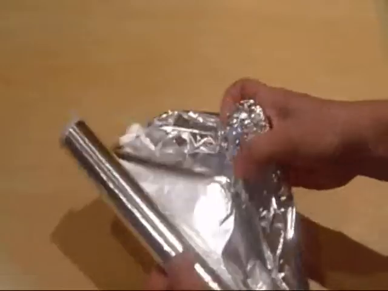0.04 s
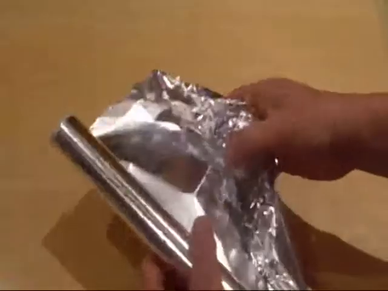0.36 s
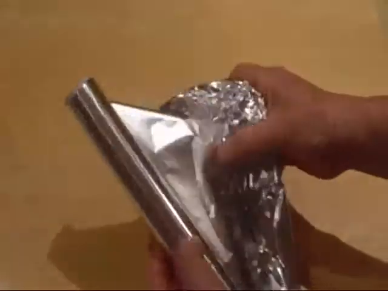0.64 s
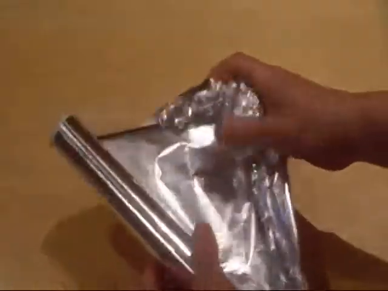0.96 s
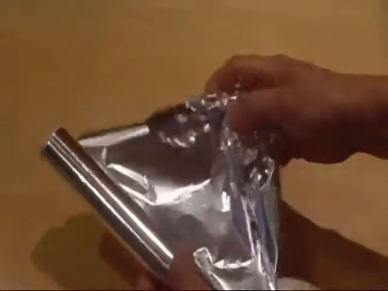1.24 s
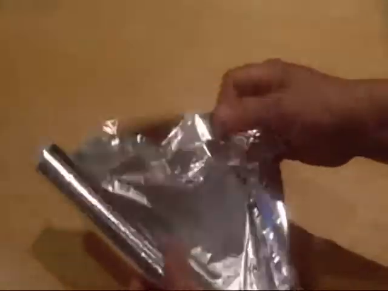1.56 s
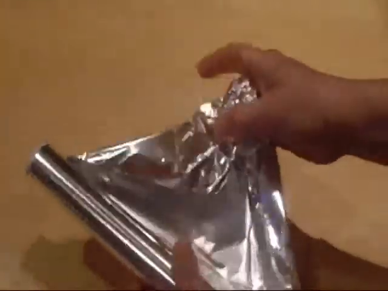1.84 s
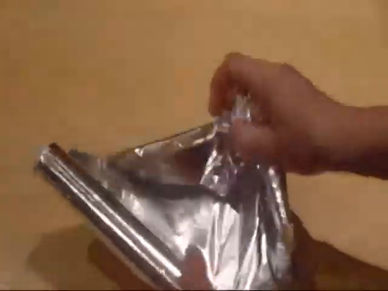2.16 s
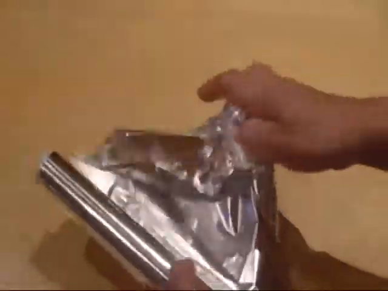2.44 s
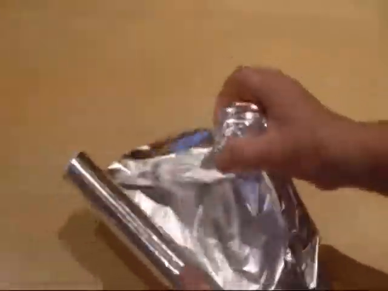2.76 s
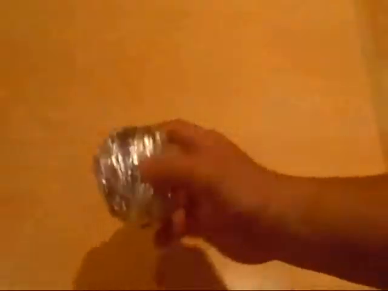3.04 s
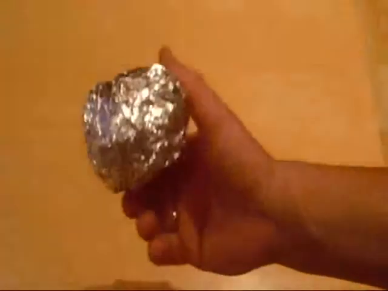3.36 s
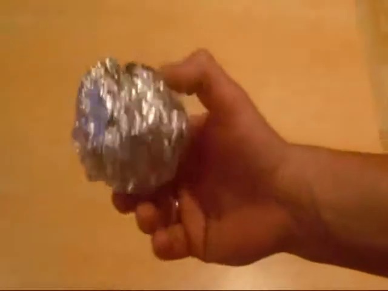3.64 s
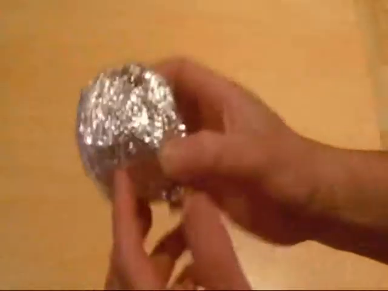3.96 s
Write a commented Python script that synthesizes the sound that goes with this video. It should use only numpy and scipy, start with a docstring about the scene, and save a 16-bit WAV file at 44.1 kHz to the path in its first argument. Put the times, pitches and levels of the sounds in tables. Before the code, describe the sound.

Close, bright crackling of aluminium foil being crushed swells and eases with sharp snaps, then cuts off. Faint ticks and rustles follow as fingers turn the foil ball in a small, quiet room.

```python
"""Crushing aluminium foil

A hand gathers foil off its roll and crushes it, close up in a small room. Thousands of tiny creases snap, in
surges as the fist tightens, and now and then a larger facet pops through. The crumpling breaks off abruptly as
the scene changes; then the finished ball ticks faintly as fingers turn it, over a low rumble."""
import sys
import numpy as np
from scipy import signal
from scipy.fft import rfft, irfft
from scipy.io import wavfile
from scipy.ndimage import uniform_filter1d

SR = 44100
rng = np.random.default_rng(int(sys.argv[2]) if len(sys.argv) > 2 else 0)


def output_pcm(signal):
    """Save a mono or channel-first signal as 16-bit PCM at the path in sys.argv[1].

    Samples are clipped to [-1, 1] before scaling.
    """
    pcm = np.clip(np.atleast_2d(signal).T, -1, 1) * 32767
    wavfile.write(sys.argv[1], SR, np.round(pcm).astype(np.int16))


N = 176400
T = np.arange(N) / SR
STOP_S, TOP_HZ = 2.964, 15720  # end of the crumpling; top edge of the sound
CREASES_PER_S, CREASE_DECAY_S = 4300, 0.00024


# The sizzle of the creases and the duller body of the sheet. Each row: frequency in Hz, relative dB.
CREASE_EQ = [(300,-31.5), (1500,-12.5), (4000,-5.5), (5700,-10), (7500,-4), (10000,1), (12500,1),
             (16000,-.5)]
SHEET_EQ = [(120,-26), (300,-10.5), (750,-9), (1150,-3), (2000,0), (2700,-1.5), (4100,-0.5), (5700,-5.5),
            (9000,-7), (16000,-51)]

def crumpling(flexes_per_s=1500, flex_decay_s=0.00052):
    """Tiny creases snap brightly while the sheet flexes under them, both riding the hand's push."""
    crease_level, sheet_level = hand_push()
    creases = snaps(CREASES_PER_S, spread_db=-2)
    flexes = even(0.56 * creases + snaps(flexes_per_s, spread_db=3.5))  # creases shake the sheet too
    clusters = amp(1.6 * wander(120))  # brief flurries, as when creases set each other off
    bright = amp(2) * colour(crackle(creases * clusters * crease_level, CREASE_DECAY_S), CREASE_EQ)
    body = amp(-1) * colour(crackle(flexes * sheet_level, flex_decay_s), SHEET_EQ)
    return bright + shifting_resonances(body + room(buckles(sheet_level)))


# The steady squeeze. Each row: time in seconds, crease drive in dB, sheet drive in dB.
SQUEEZE = [(0, -27.5, -32.5), (0.18, -29, -32), (0.2, -34.5, -36), (0.35, -30.5, -32), (0.47, -34, -37),
           (0.62, -28, -31.5), (0.74, -32.5, -34.5), (0.81, -26, -27), (0.93, -35, -36), (1.07, -37, -36),
           (1.25, -27.5, -30.5), (1.42, -32.5, -34.5), (1.49, -38, -41), (1.51, -41, -35),
           (1.73, -30, -36.5), (1.74, -34, -38.5), (2.1, -33.5, -35.5), (2.15, -28.5, -31.5),
           (2.42, -27.5, -35.5), (2.56, -28.5, -33.5), (2.61, -40, -40.5), (2.62, -29.5, -35),
           (2.79, -26.5, -31.5), (2.81, -29, -34.5), (2.96, -34, -34.5)]
# Folds giving way. Each row: centre and half width in seconds, crease drive and sheet drive in dB.
FOLD_SURGES = [(0.008, 0.0055, -30, -34), (0.089, 0.0047, -26, -30), (0.276, 0.0085, -29, -35),
               (0.376, 0.011, -26, -35), (0.42, 0.0074, -26.5, -33), (0.545, 0.012, -24.5, -31.5),
               (0.672, 0.007, -28.5, -36), (0.789, 0.0095, -26, -35), (0.823, 0.0035, -26, -31),
               (0.945, 0.0033, -29, -33), (1.003, 0.014, -25.5, -28.5), (1.089, 0.011, -23, -29),
               (1.134, 0.009, -21, -27.5), (1.228, 0.004, -26.5, -37), (1.35, 0.0035, -26, -40),
               (1.381, 0.004, -28, -35), (1.543, 0.023, -30, -35.5), (1.658, 0.015, -28.5, -34.5),
               (1.82, 0.0045, -29, -35), (1.859, 0.009, -20.5, -25), (1.988, 0.0032, -25, -36),
               (2.04, 0.02, -29, -30.5), (2.244, 0.0046, -23.5, -35), (2.284, 0.012, -27, -29.5),
               (2.346, 0.011, -28, -33.5), (2.421, 0.019, -26.5, -29), (2.724, 0.0081, -25, -30),
               (2.768, 0.014, -32, -34), (2.92, 0.015, -23.5, -32)]

def hand_push():
    """Envelopes for creases and sheet: the fist's pressure, with a surge whenever a fold gives way."""
    times, creases_db, sheets_db = np.array(SQUEEZE).T
    crease_power = amp(np.interp(T, times, creases_db)) ** 2
    sheet_power = amp(np.interp(T, times, sheets_db)) ** 2
    for centre, width, crease_db, sheet_db in FOLD_SURGES:
        surge = swell(centre, width)
        crease_power += surge * amp(crease_db) ** 2
        sheet_power += surge * amp(sheet_db) ** 2
    return np.sqrt(crease_power), np.sqrt(sheet_power)


def buckles(push, per_s=170, centre_hz=2620, spread_oct=0.68, spread_db=2.5, decay_cycles=2.05):
    """Small facets flip at random, each ringing a few cycles at its own pitch."""
    t = T[:1000]
    out = np.zeros(N + len(t))
    draws = rng.standard_normal((1500, 3))
    starts = np.cumsum(np.abs(draws[:, 0])) * np.sqrt(np.pi / 2) / per_s
    for start, (_, pitch, strength) in zip(starts[starts < STOP_S], draws):
        i = int(start * SR)
        hz = min(centre_hz * 2 ** (spread_oct * pitch), TOP_HZ)
        ring = np.sin(2 * np.pi * hz * t) * np.exp(-hz * t / decay_cycles)
        out[i:i + len(t)] += push[i] * amp(spread_db * strength) * ring
    return out[:N]


# The hollow low register, fuller while the foil is slack. Each row: time in seconds, gain in dB.
HOLLOWNESS = [(0,3), (.2,0), (.4,-2), (.55,2), (.79,-1), (.88,2), (1.1,-2), (1.42,-1.5), (1.8,-0.5),
              (1.92,-0.5), (2.05,-1.5), (2.28,-0.5), (2.42,1.5), (2.53,-2.5), (2.68,1), (2.77,1), (2.95,1)]

def shifting_resonances(sheet, bands=18, shift_db=1.8, shifts_per_s=11, hollow_top_hz=2600):
    """The sheet changes shape: each narrow band swells and fades, and the low ones follow the slack."""
    spectrum = rfft(sheet)
    log_hz = np.log(np.arange(N // 2 + 1) * SR / N + 1)
    centres_hz = np.geomspace(600, 9000, bands)
    hollow_db = np.interp(T, *np.array(HOLLOWNESS).T)
    out = np.zeros(N)
    for hz, solo in zip(centres_hz, np.eye(bands)):
        band = irfft(spectrum * np.interp(log_hz, np.log(centres_hz), solo), N)
        out += band * amp(shift_db * wander(shifts_per_s) + hollow_db * (hz < hollow_top_hz))
    return out


# Larger facets. Each row: start in seconds, level in dB, ring in Hz, crack against the ring in dB.
FACET_POPS = [(0.014,-26,2400,-7), (0.037,-23.5,2000,-10), (0.0585,-24,1550,-3), (0.2765,-18,1423,-9),
              (0.663,-25,1080,1.5), (0.673,-21.5,2030,-5), (0.81,-23,1830,2), (0.859,-20.5,2020,-3),
              (1.637,-31,1840,3.5), (1.812,-27.5,1600,4.5), (1.98,-33,1340,4), (2.045,-27.5,1050,-4),
              (2.151,-26.5,1320,-3), (2.415,-24,2030,-5), (2.868,-29,2040,2)]

def pops(rows=FACET_POPS, decay_s=0.0025, rise_s=0.00052):
    """A facet pops through: a few cycles of its ring, with a crack of noise."""
    out = np.zeros(N)
    crack = colour(rng.standard_normal(N), SHEET_EQ)
    for start, db, hz, crack_db in rows:
        envelope = fade(start, decay_s) * (1 - fade(start, rise_s))
        envelope /= envelope.max() + 1e-9
        ring = np.sin(2 * np.pi * hz * (T - start))
        out += amp(db) * envelope * (ring + amp(crack_db) * crack)
    return out


# Sharp accents in the crush. Each row: start in seconds, level in dB.
LONG_CREASES = [(.425,-22), (.663,-26), (.825,-21), (.941,-22), (.999,-20.5), (1.083,-22), (1.125,-20),
                (1.322,-35), (1.377,-23), (1.547,-22), (1.635,-21.5), (1.751,-27), (1.911,-25), (2.115,-19),
                (2.277,-19), (2.501,-19), (2.723,-25), (2.913,-18.5), (2.933,-17)]

def cracks(decay_s=0.0062):
    """A long crease gives way all at once, in a bright, quickly dying spray."""
    power = sum((amp(db) * fade(start, decay_s)) ** 2 for start, db in LONG_CREASES)
    return colour(np.sqrt(power) * rng.standard_normal(N), CREASE_EQ)


# Ticks of the ball. Each row: start in seconds, bright edge in dB, dull body in dB.
BALL_TICKS = [(3.01,-53,-47), (3.018,-45,-42), (3.022,-45,-45), (3.038,-38,-51), (3.144,-42,-57),
              (3.15,-45,-48), (3.160,-45,-47), (3.219,-44,-47), (3.254,-47,-49), (3.369,-45,-63),
              (3.38,-50,-61), (3.632,-52,-57), (3.568,-48,-45), (3.706,-39,-55), (3.719,-47,-46),
              (3.724,-38,-53), (3.798,-37.5,-62), (3.835,-41,-55), (3.872,-46,-53), (3.932,-47,-44),
              (3.947,-41,-43)]
# Fingers sliding on it. Each row: centre in seconds, half width in seconds, level in dB.
FINGER_RUBS = [(3.025,.007,-57), (3.157,.012,-65), (3.303,0.0057,-59), (3.655,0.013,-55.5), (3.72,.015,-63),
               (3.94,0.013,-63)]
# The ball's bright edge and dull body. Each row: frequency in Hz, relative dB.
BALL_EDGE_EQ = [(500,-26), (2000,-8), (5000,-10.5), (8000,-4.5), (12000,-1.5), (16000,-8)]
BALL_BODY_EQ = [(400,-22), (1300,-3), (2200,-2), (3200,-9), (5000,-10), (16000,-23)]

def ball(edge_decay_s=0.0011, body_decay_s=0.0018):
    """The tight ball ticks and rustles as the fingers turn it."""
    edge_level = sum(amp(db) * fade(start, edge_decay_s) for start, db, _ in BALL_TICKS)
    body_level = sum(amp(db) * fade(start, body_decay_s) for start, _, db in BALL_TICKS)
    slide = np.sqrt(sum(amp(db) ** 2 * swell(centre, width) for centre, width, db in FINGER_RUBS))
    rustle = slide * crackle(snaps(CREASES_PER_S, spread_db=5), CREASE_DECAY_S)
    edge = colour(edge_level * rng.standard_normal(N) + rustle, BALL_EDGE_EQ)
    body = colour(body_level * rng.standard_normal(N) + amp(-1) * rustle, BALL_BODY_EQ)
    return edge + body


# Dents in the ball. Each row: start in seconds, level in dB, ring in Hz, crack against the ring in dB.
BALL_DENTS = [(3.0087,-36,2500,-1.5), (3.5702,-41.5,2130,-5)]

def dents():
    """A dent gives way in the ball with a small, tight pop."""
    return pops(BALL_DENTS, decay_s=0.0009)


# The room tone, heavy in the lows. Each row: frequency in Hz, relative dB.
RUMBLE_EQ = [(12, -18), (25, 1.5), (50, -6), (110, -6.5), (170, -10.5), (340, -14.5), (550, -19),
             (1000, -26), (2000, -32.5), (3200, -36.5), (6000, -40), (11000, -42.5), (16000, -45)]

def rumble(level_db=-45):
    """A steady bed of low noise fills the room."""
    return amp(level_db) * unit(colour(rng.standard_normal(N), RUMBLE_EQ))


def room(x, wall_delay_s=0.0044, t60_s=0.095, wet_db=-10.5):
    """The table and near walls add a short tail."""
    t = T[:12000]
    tail = rng.standard_normal(len(t)) * (t > wall_delay_s) * np.exp(-np.log(1000) * t / t60_s)
    wet = signal.fftconvolve(x, tail / np.linalg.norm(tail))[:N]
    return (x + amp(wet_db) * wet) / np.hypot(1, amp(wet_db))


def snaps(per_s, spread_db):
    """Impulses at random moments and of random strength."""
    return even((rng.random(N) < per_s / SR) * amp(spread_db * rng.standard_normal(N)))


def even(hits, window_s=0.041):
    """The hand's push evens out the snapping: short-term power stays near 1."""
    size = int(window_s * SR)
    power = uniform_filter1d(uniform_filter1d(hits ** 2, size), size)
    return hits / np.sqrt(np.abs(power) + 1e-12)


def crackle(hits, decay_s, tail_db=-2, tail_decay_s=0.0064):
    """Each snap is a brief burst of noise, trailed by a softer, longer tail from the room."""
    share = amp(tail_db) ** 2
    power = (die_away(hits ** 2, decay_s) + share * die_away(hits ** 2, tail_decay_s)) / (1 + share)
    return np.sqrt(power + 1e-18) * rng.standard_normal(N)


def die_away(power, decay_s):
    """Gives each burst of power a tail; decay_s is the time constant of its amplitude."""
    feedback = np.exp(-2 / (decay_s * SR))
    return signal.lfilter([1 - feedback], [1, -feedback], power)


def wander(per_s):
    """Glides between random values, per_s of them a second; RMS 1."""
    hold = int(SR / per_s)
    steps = np.repeat(rng.standard_normal(N // hold + 2), hold)
    return unit(uniform_filter1d(steps, hold)[rng.integers(hold):][:N])


def colour(x, eq, size=8192):
    """Minimum-phase EQ that keeps attacks sharp; white noise keeps its power."""
    hz, db = np.array(eq).T
    bins_hz = np.arange(size // 2 + 1) * SR / size
    gain = unit(amp(np.interp(np.log(bins_hz + 1), np.log(hz), db)))
    cepstrum = irfft(np.log(gain))
    cepstrum[1:size // 2] *= 2
    cepstrum[size // 2 + 1:] = 0
    return signal.fftconvolve(x, irfft(np.exp(rfft(cepstrum))))[:len(x)]


def swell(centre, width):
    """A bell-shaped rise and fall."""
    return np.exp(-.5 * ((T - centre) / width) ** 2)


def fade(start, decay_s):
    """Instant attack, exponential decay."""
    return (T >= start) * np.exp(-np.abs(T - start) / decay_s)


def amp(db):
    """Decibels to amplitude."""
    return 10 ** (np.asarray(db) / 20)


def unit(x):
    """Scales to RMS 1."""
    return x / np.sqrt(np.mean(x ** 2))


def scene():
    """The crumpling until the scene cuts abruptly, then the ball, over the rumble; all dead centre."""
    gate = np.exp(-np.maximum(T - STOP_S, 0) / 0.002)
    crush = gate * (crumpling() + room(pops() + cracks()))
    mono = crush + room(ball() + dents()) + rumble()
    return np.array([mono, mono])


def record(dry):
    """A steep low-pass takes off the very top."""
    return signal.sosfilt(signal.ellip(12, .1, 80, TOP_HZ, fs=SR, output="sos"), dry)


dry = scene()
out = record(dry)
output_pcm(out)
```